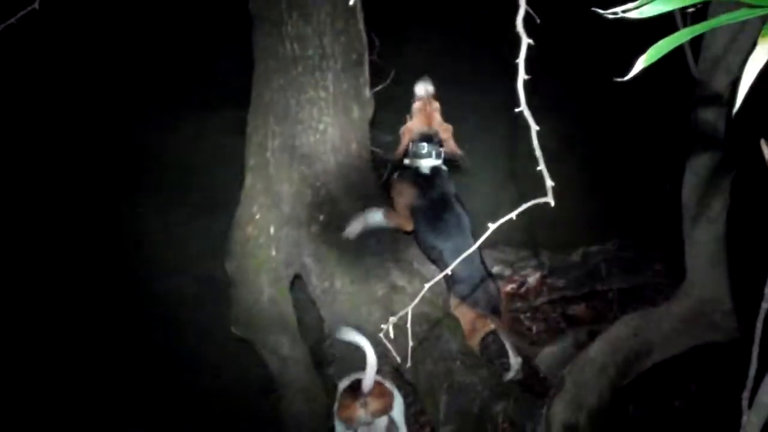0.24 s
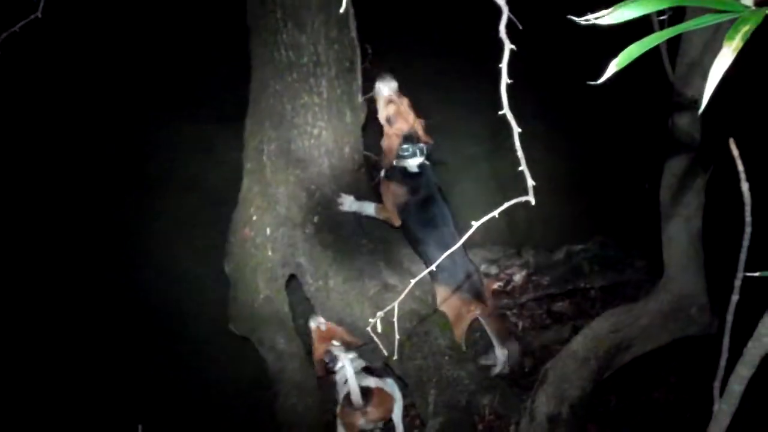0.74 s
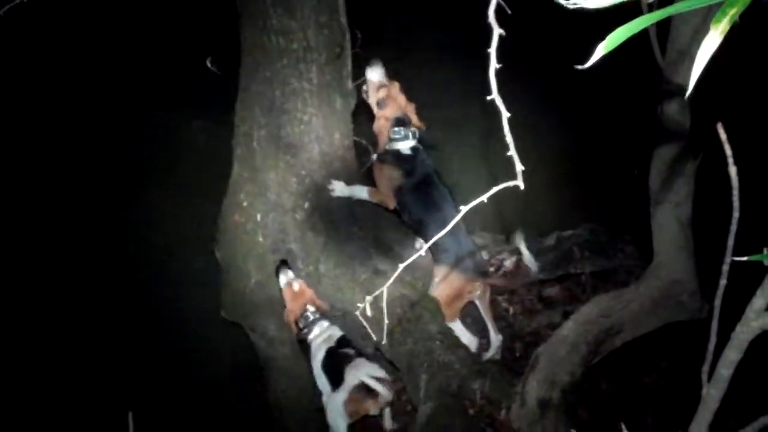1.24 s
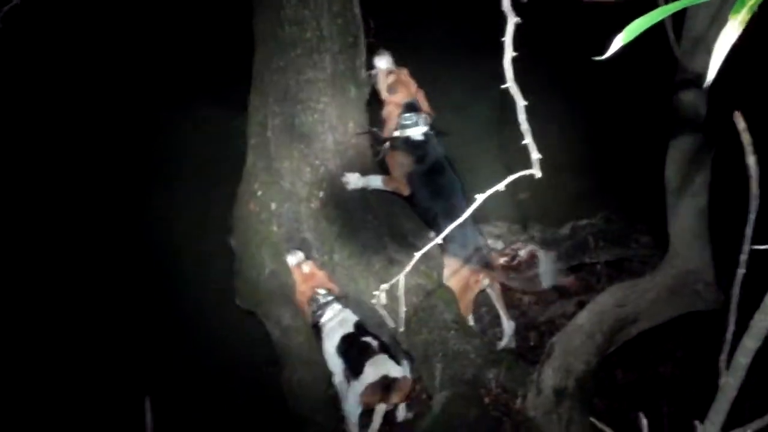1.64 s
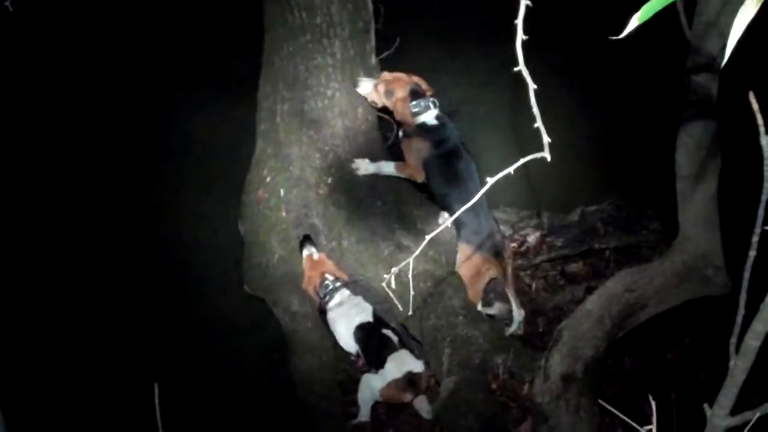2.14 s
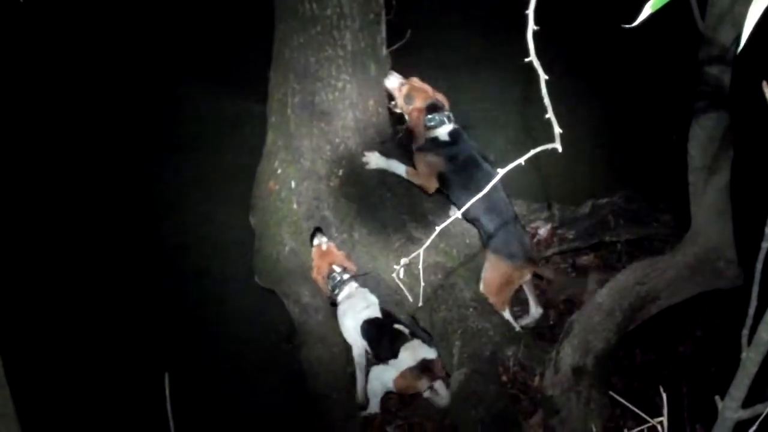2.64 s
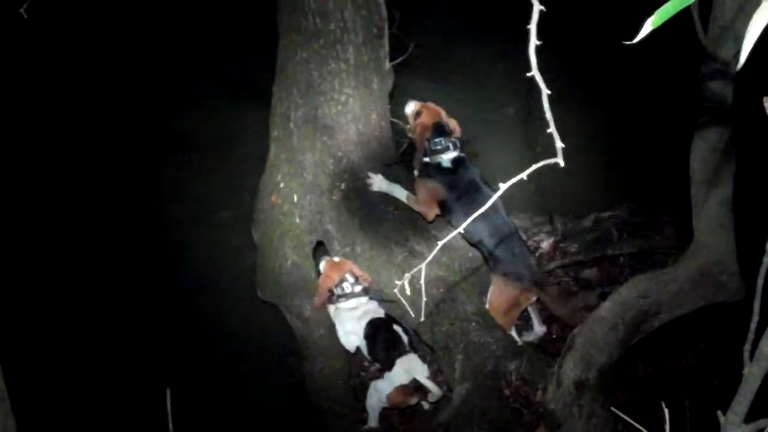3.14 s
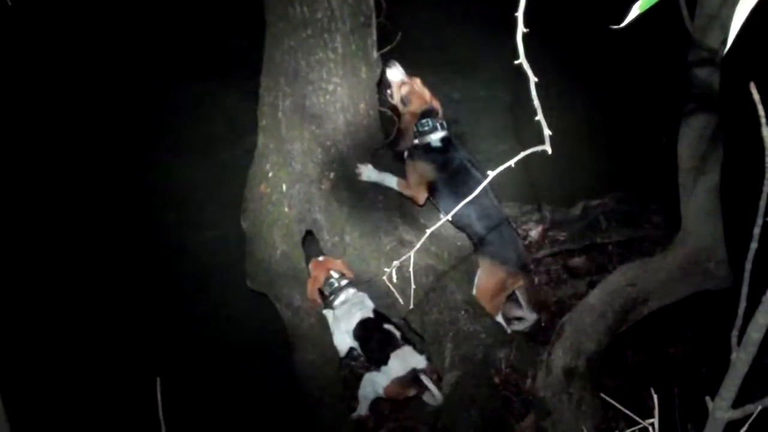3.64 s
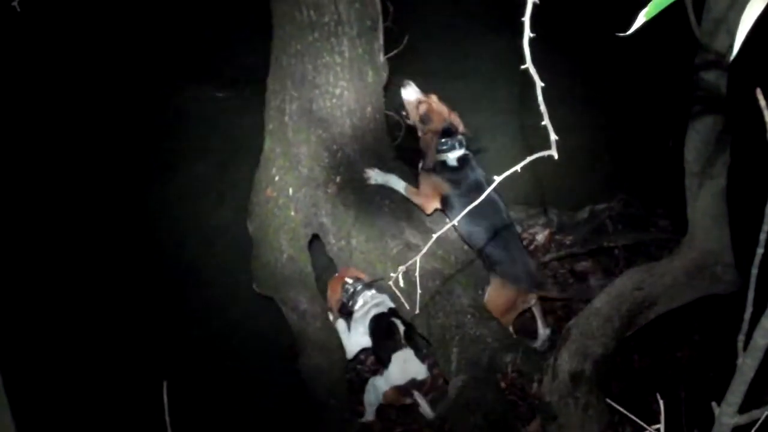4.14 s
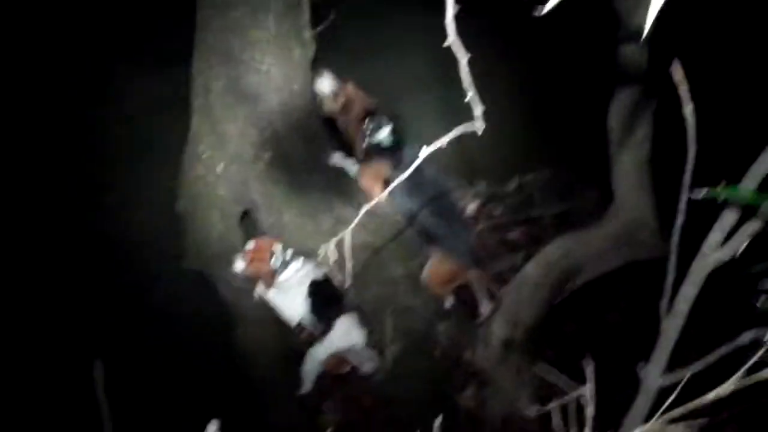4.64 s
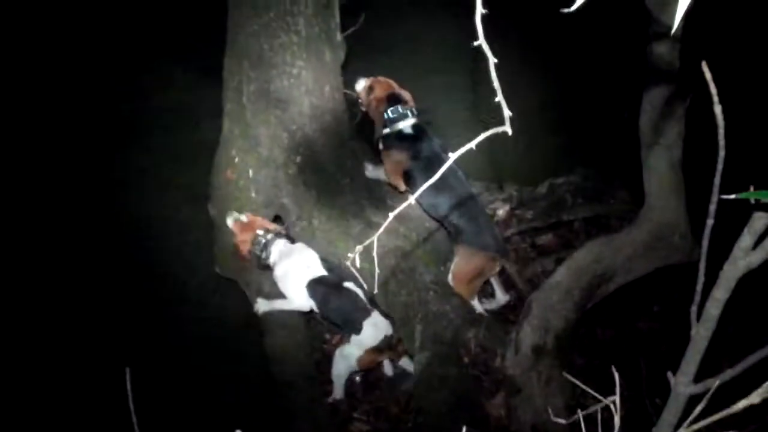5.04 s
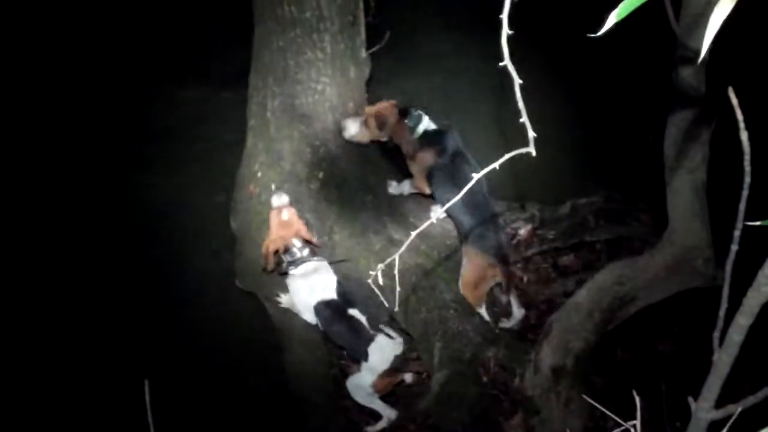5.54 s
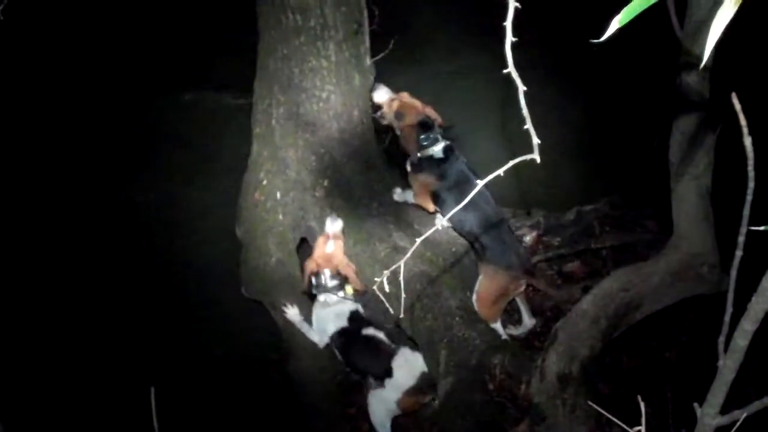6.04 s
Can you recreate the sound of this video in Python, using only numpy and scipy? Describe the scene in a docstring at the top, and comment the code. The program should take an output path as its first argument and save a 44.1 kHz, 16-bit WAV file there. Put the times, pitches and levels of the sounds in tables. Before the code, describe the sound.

Two hounds bark up a tree at night, one in steady hoarse chops about twice a second, the other briefly joining higher, over rustling leaves.

```python
"""Two hounds bark up a tree at night in a wood, close to a small stereo microphone and a little to the left.
Each bark is a stack of voiced partials, with throat resonances rasping most at its start and end.
Breath hiss follows the voice, pitches drop after barks, and thin nose whistles and high squeaks come between.
Claws tick on bark and twigs; paws crackle in the leaves over a low rumble of air on the microphone.
One near trunk throws back treble, the wood sends a diffuse echo, and the loudest barks overload the input."""
import sys
import numpy as np
from scipy import signal
from scipy.io import wavfile

SR = 44100
rng = np.random.default_rng(int(sys.argv[2]) if len(sys.argv) > 2 else 0)


def persist_wave(psi):
    """Save psi, clipped to +-1, as 16-bit WAV."""
    counts = np.round(np.clip(psi, -1, 1) * 32767).astype(np.int16)
    wavfile.write(sys.argv[1], SR, np.atleast_2d(counts).T)


N = 276551
TIME = np.arange(N) / SR

# All source levels are relative: the echoes, the left-right balance and the input stage follow.
# Barks, one curve each: t/s, pitch f/Hz, fundamental level/dB,
# mouth opening as lift of partial 2/dB, strain as lift of partial 3/dB
LOW_HOUND_BARKS = [
    [(.335, 540.5, -29.5, 20, 7), (.362, 555.4, -3.5, 4.5, -10.5), (.385, 528, -3, 9, 1),
     (.395, 537.4, 0.5, -9.5, -17), (.403, 558.2, 0.5, -25, -33), (.435, 558.6, -3, -16, -34),
     (.451, 609.4, -1.5, -29, -35), (.49, 584, -20, -25, -23)],
    [(.705, 447, -58, 22, 28), (.729, 486, -23, 4.5, -8), (.759, 513.6, -16, -11, -4.5),
     (.79, 521, -27, 4, -6)],
    [(1.325, 567, -32.5, 13, -2), (1.341, 532, -15.5, 7, -2.5), (1.363, 505.2, -19, 11, -3),
     (1.415, 506.6, -21, 7, 4), (1.44, 484, -22, -1, -21)],
    [(1.87, 575.5, -19, -4, -22), (1.894, 501.6, -20.5, 7, 0), (1.944, 491.8, -24, 11.5, 2),
     (1.97, 480, -25.5, -2, -4)],
    [(2.3, 479, -29, 28, -18), (2.318, 498, -25, 7, 7), (2.338, 497, -14.5, 7, 2),
     (2.346, 549, -8, -11.5, -9), (2.358, 528, -3.5, -38, -14), (2.392, 576.5, -7.5, -39, -40),
     (2.405, 594, -43, -22.5, 2)],
    [(2.81, 515.6, -32, 9.5, -3), (2.834, 490.6, -21.5, 11.5, -2.5), (2.872, 475.5, -19, -5, 2.5),
     (2.884, 480, -15.5, 2.5, -20), (2.893, 573.5, -10.5, -24, -15), (2.902, 473.5, -17.5, 7.5, -16),
     (2.915, 473, -26, 7, -14)],
    [(3.285, 486, -38, 18, -1), (3.305, 469.2, -16, 11, -2), (3.317, 506.3, -14, 0, 4.5),
     (3.355, 486, -16, 6, -1), (3.369, 498.5, -6, -6, -16.5), (3.393, 558, -13.5, -9.5, -16),
     (3.41, 468, -21.5, 14.5, -18)],
    [(3.74, 526, -31, 4.5, -2), (3.76, 486.6, -17, 13, 5), (3.8, 472.8, -21, 10, 0),
     (3.834, 453, -29, 17, 3.5), (3.855, 414, -34.5, -11, -7)],
    [(4.21, 452, -53, 19.5, 8), (4.226, 498, -25.5, 11, 1.5), (4.254, 470, -30, 21.5, 8.5),
     (4.288, 480.3, -19.5, 3.5, -2), (4.3, 533, -15.5, -17, -21), (4.32, 526, -21, -18, -18)],
    [(4.66, 535.4, -31, 7, -5), (4.676, 502.5, -20.5, 16, 3.5), (4.72, 498.5, -20, 12.5, -1),
     (4.733, 522.6, -7, -21, -13), (4.746, 565, -8, -28, -25), (4.762, 588, -7.5, -11, -28),
     (4.785, 544, -19.5, -22, -23)],
    [(5.465, 515, -46, 29, 8), (5.475, 525.7, -29.5, 17, 11), (5.483, 550, -24.5, 7, 10.5),
     (5.5, 563.3, -12.5, 1, 1.5), (5.519, 620.6, 0, -30, -15), (5.535, 590.4, -2, -11, -14),
     (5.569, 598, -12, -31, -29), (5.61, 615, -15.5, -26, -33)],
    [(5.885, 487.4, -35, 11, 6.5), (5.913, 546, -10, -22, -18.5), (5.937, 538.3, -6, -24, -13.5),
     (5.975, 540, -14.5, -13.5, -20)],
    [(6.05, 553.6, -15, -14, 5), (6.068, 562, -18.5, -13, -10), (6.112, 563.2, -6.5, -14, -10.5),
     (6.135, 550, -37, -28, -20)],
]
HIGH_HOUND_BARKS = [
    [(.33, 648, -33, -5, -16), (.342, 672, -1.5, -37, -35), (.352, 664, -1, -32, -30),
     (.375, 627, -15.5, -24, -19)],
    [(.663, 772, -41, -10, -23), (.669, 823, -25, -7, -18), (.687, 869, -18.5, -1.5, -43),
     (.692, 786, -15.5, -17, -34), (.7, 709.3, -17.5, -2, -12), (.748, 631.4, -9.5, -11, -33),
     (.794, 598, -15, -3.5, -8.5), (.805, 600, -31, -25, -27)],
    [(5.84, 718, -33.5, -25, -20), (5.864, 661.5, -19.5, -16, -12), (5.874, 657, -30.5, 4.5, 3),
     (5.9, 607, -15, -26, -18)],
]
# Falling yelps of the higher hound, rich in upper partials, same columns
HIGH_HOUND_YELPS = [
    [(5.4, 815, -54.5, 29.5, 19.5), (5.432, 705, -42, 17.5, -5.5), (5.454, 666, -11, -3, -9),
     (5.478, 623, -44, 24, 1)],
    [(5.99, 769, -15, -5, -43), (6.006, 675, -41, 0, -11), (6.024, 609.7, -30, 4, -11),
     (6.065, 564, -13, -14, -24)],
]
# Partial 4 against partial 3 with no lift, one value a call [level/dB];
# then the share of the mouth's lift that partial 4 follows [ratio]
LOW_BARK_FOURTH = ([-16, -23, -16.5, -15, -6.5, -3.5, -2.5, -14, -14.5, -13.5, -13.5, -16, -5], 0.65)
HIGH_BARK_FOURTH = ([10, -28, -34], 0.43)
HIGH_YELP_FOURTH = ([-6.5, 8], .1)
# Partials 5 to 12 against partial 4: f/Hz, level/dB
BARK_UPPER_PARTIALS = [(2000, -17), (2500, -22), (3100, -25.5), (4000, -39), (4700, -43.5), (5500, -26)]
YELP_UPPER_PARTIALS = [(2600, 0), (3200, -17), (4200, -16), (4900, -8), (5600, -24), (6400, -20),
                       (7000, -40)]

# Rasp of each call: start t/s, end t/s, level/dB at the opening, in the middle and at the close,
# weight of the lowest throat resonance level/dB
CALL_RASPS = [(0.324, 0.479, -8.5, -10, -11, -10.5), (0.671, 0.833, -42.5, -17.5, -29, 0),
              (1.306, 1.481, -26.5, -34.5, -30, -4.5), (1.856, 2.008, -24.5, -35, -29, -2),
              (2.28, 2.427, -16.5, -24, -23, -6), (2.793, 2.946, -22, -34.5, -21.5, -3),
              (3.278, 3.436, -25, -23.5, -18.5, -1.5), (3.723, 3.88, -24.5, -35, -33.5, 0),
              (4.196, 4.357, -34, -45, -29.5, -4), (4.648, 4.796, -16, -27, -19.5, -4.5),
              (5.02, 5.149, -33.5, -39, -35, -43), (5.413, 5.6, -39, -7, -24, -4),
              (5.853, 6.022, -34.5, -29.5, -26, -0.5), (6.028, 6.158, -23, -11.5, -21.5, -11),
              (6.258, 6.386, -24.5, -20, -20, -27)]
# Level steps/dB: start against the opening, end against the close
RASP_EDGE_STEPS = (-2, -12.5)
# Added weight of the lowest resonance/dB: start, opening, middle, close, end
RASP_LOW_WEIGHTS = (4, 15, 1.5, 0, 26)
# Throat resonances, lowest first: f/Hz, width f/Hz, level/dB
THROAT_RESONANCES = [(663.2, 98, -2.5), (1039.5, 267, -2.5), (1390, 87, -12.5), (1594, 390, -4.5),
                     (1900, 790, -10), (2920, 640, -25.5)]
# Opening after the start [s], middle as share of the length, close before the end [s]
RASP_OPENS_S, RASP_MIDDLE, RASP_CLOSES_S = 0.019, 0.29, 0.043

# Brief tones that lead into a bark before the voice settles: t/s, f/Hz, level/dB
BARK_LEAD_INS = [(0.326, 1031, -9), (1.306, 1143, -16.5), (1.85, 1200, -23), (2.283, 1088, -14),
                 (2.795, 1086, -28), (3.281, 1007, -18), (3.722, 1095, -23.5), (4.644, 1060, -16)]
LEAD_IN_S = 0.026

# Air hissing past tongue and teeth while the voice sounds: f/Hz, width f/Hz, level/dB
BREATH_BANDS = [(4000, 2500, -70.5), (5200, 1500, -40), (6530, 2100, -50), (9270, 1200, -69),
                (11200, 1500, -72)]
BREATH_LAG_S = 0.0022

# Pitch drops as the folds slacken at the end of a bark: start t/s, level/dB
PITCH_DROPS = [(.79, -37), (1.435, -43), (1.965, -41), (2.4, -32.5), (2.91, -35.5), (3.405, -34),
               (3.85, -37), (4.314, -35), (4.775, -32), (5.975, -34), (6.13, -47)]
# Course of each drop: t/s after its start, pitch f/Hz, level/dB
DROP_COURSE = [(0, 440, -3), (.02, 340, 0), (.042, 185, -7), (.075, 115, -14)]
DROP_BARE_DB = -11   # fundamental, heard below the throat resonance

# Nose whistles and whines: t/s, length t/s, start f/Hz, loudest f/Hz, end f/Hz,
# peak level/dB, overtone against it level/dB
NOSE_WHISTLES = [(.51, .11, 3841, 3750, 3830, -50, -8), (0.625, .06, 3728, 4185, 4522, -35.5, -14.5),
                 (1.06, 0.053, 3860, 3815, 3810, -35.5, -42), (2.265, 0.02, 3720, 3880, 4050, -25.5, -17),
                 (2.774, 0.021, 4120, 3960, 3930, -44, -8), (3.206, 0.011, 3780, 3470, 3720, -31.5, -33),
                 (3.264, 0.012, 3930, 4020, 4160, -20, -25), (4.991, 0.025, 3600, 4120, 4510, -42.5, -46),
                 (5.05, 0.088, 1278, 1146, 1050, -39, 7), (5.081, 0.07, 1910, 2076, 2246, -22.5, -16),
                 (5.097, 0.052, 4020, 3800, 3230, -36, -11), (5.198, 0.047, 2370, 2750, 3190, -30, -16),
                 (5.214, 0.086, 3130, 3050, 2900, -31.5, -30), (5.336, .025, 2720, 3280, 3460, -31, -8),
                 (5.36, .04, 3670, 4300, 4700, -45.5, -20), (5.411, 0.026, 3730, 4000, 4030, -29, -1.5),
                 (5.445, 0.024, 4370, 4240, 4050, -30, -11), (5.83, 0.022, 3970, 4080, 4100, -39, -12),
                 (5.932, 0.027, 3210, 3330, 4000, -42.5, -13), (6.155, 0.03, 2310, 2670, 2950, -37, -26)]
WHISTLE_PEAK, WHISTLE_EDGE_DB = 0.46, -15   # loudest point as share of the length; ends against the peak

# High squeaks as the mouth opens: t/s, peak level/dB, f/Hz
MOUTH_SQUEAKS = [(0.332, -24, 9120), (0.6734, -40, 8970), (1.3104, -43, 8860), (1.85, -45, 8840),
                 (2.2872, -28, 8900), (2.7945, -36, 8900), (3.2823, -30, 9050), (3.7336, -34, 8880),
                 (4.2024, -49.5, 9100), (4.649, -35.5, 8970), (5.434, -24.5, 8950), (5.851, -41, 8960),
                 (6.25, -43.5, 8920)]
# Weaker side tones of a squeak: offset f/Hz, level/dB
SQUEAK_SIDE_TONES = [(-1250, -8), (1195.5, -12.5)]
SQUEAK_RISE_S, SQUEAK_EARLY_S = 0.0079, 0.0045   # rise time; start ahead of the listed time

# Claws and twigs: t/s, level/dB
CLAW_TICKS = [(0.164, -29.5), (0.2032, -32), (1.322, -30), (3.049, -72), (3.1908, -54), (3.2104, -47),
              (4.5244, -39.5), (5.032, -45), (5.051, -39.5), (5.1674, -41), (5.474, -27), (5.52, -27),
              (5.742, -45), (6.0582, -33.5)]
# Damped modes of bark and twigs: f/Hz, level/dB, decay by 60 dB t/s
BARK_AND_TWIG_MODES = [(1700, 1.5, .012), (2820, 3, .01), (3830, 0, 0.036), (5120, 4.5, 0.01),
                       (6620, -1, 0.0048), (9300, -5, 0.012)]

NEAR_TRUNK_S, NEAR_TRUNK_DB, NEAR_TRUNK_HZ = 0.0015, -6, 2760   # delay, level, lower edge of the treble
WOOD_DB, WOOD_DULL_HZ, WOOD_ALIKE = -18.5, 3000, 0.92   # echo level, treble loss, left-right likeness
WOOD_T60_S = 0.38
FAR_T60_S, FAR_DB = 0.84, -18.5   # distant trunks answer weaker and longer

# Paws in the leaves and air on the microphone: t/s, rustle level/dB, rumble level/dB
GROUND_LEVELS = [(0.0, -32, -39.5), (0.42, -31, -66), (0.56, -47, -83), (1.1, -45.5, -66.5),
                 (1.94, -50, -83), (2.3, -36.5, -55), (2.6, -46, -68.5), (3.04, -42, -63),
                 (3.28, -36.5, -55), (3.44, -43, -61), (4.36, -52, -74), (4.7, -34, -60), (4.89, -46, -75),
                 (5.19, -36, -85), (5.32, -40, -52), (5.45, -27.5, -55), (5.66, -47.5, -66),
                 (6.05, -38, -56), (6.27, -49.5, -60)]
# Colour of the leaves: f/Hz, level/dB per Hz
LEAF_SPECTRUM = [(150, -18), (300, -5.5), (600, 1.5), (1500, 2.5), (3000, -3), (4500, -2), (6300, -17.5),
                 (9000, -13.5), (11000, -27), (14000, -29.5)]
# Leaves at left and right: f/Hz, likeness [ratio]
LEAF_LIKENESS = [(60, 0.45), (150, 0.2), (390, 1), (1010, 0.95), (2600, 0.25)]

LEFT_LOUDER_DB = 2
MICROPHONE_TOP_HZ, CUTOFF_HZ = 11600, 14500
LOPSIDED, OVERLOAD = 0.015, 1.3   # share of the squared signal; clipping ceiling


def amp(db):
    """Decibels to gain."""
    return 10 ** (np.asarray(db) / 20)


def rms_one(x):
    """Scale to unit rms."""
    return x / np.sqrt(np.mean(x ** 2) + 1e-20)


def at_hz(points, hz):
    """Read a spectrum on a log-frequency axis."""
    points = np.array(points)
    return np.interp(np.log(hz), np.log(points[:, 0]), points[:, 1])


def drift(rate_hz):
    """Low-passed noise of unit rms: a random wander, faster at a higher rate."""
    r = np.exp(-2 * np.pi * rate_hz / SR)
    noise = rng.standard_normal(N + SR)
    settled = signal.lfilter([1], [1, -2 * r, r * r], noise)[SR:]
    return rms_one(settled)


def resonance(x, hz, width_hz):
    """Two-pole resonance with a gain of about 1 at its top."""
    r = np.exp(-np.pi * width_hz / SR)
    feedback = [1, -2 * r * np.cos(2 * np.pi * hz / SR), r * r]
    return signal.lfilter([(1 - r * r) / 2, 0, (r * r - 1) / 2], feedback, x)


def call(rows, fade_s):
    """Sample range, faded window and interpolated columns of one call."""
    s, *columns = np.transpose(rows)
    span = slice(int(s[0] * SR), min(int(s[-1] * SR) + 1, N))
    t = TIME[span]
    edge_distance = np.minimum(t - s[0], s[-1] - t)
    window = np.sin(np.pi / 2 * np.clip(edge_distance / fade_s, 0, 1))
    return span, window, [np.interp(t, s, c) for c in columns]


def voice(calls, fourth, upper, jitter, shimmer_db):
    """Vocal folds give a stack of wavering partials; an open mouth and strain lift the upper ones."""
    out, wobble, flutter = np.zeros(N), drift(86), drift(45)
    shut_levels, lift_share = fourth
    for rows, shut_db in zip(calls, shut_levels):
        span, window, (pitch, level_db, lift_db, strain_db) = call(rows, fade_s=0.0048)
        phase = 2 * np.pi * np.cumsum(pitch * (1 + jitter * wobble[span])) / SR
        fourth_db = strain_db + shut_db + lift_share * lift_db
        partials_db = [0, lift_db, strain_db, fourth_db]   # against the fundamental
        partials_db += [fourth_db + at_hz(upper, k * pitch) for k in range(5, 13)]
        for k, db in enumerate(partials_db, start=1):
            gain = amp(level_db + db + shimmer_db * flutter[span])
            out[span] += np.sqrt(2) * window * gain * np.sin(k * phase)
    return out


def rasp():
    """Uneven fold pulses and breath noise ring the throat resonances, shaped from opening to close."""
    pulses = (rng.random(N) < 700 / SR) * rng.standard_normal(N) * 4.75   # about 700 a second
    source = pulses + rng.standard_normal(N)
    bands = []
    for k, (hz, width, db) in enumerate(THROAT_RESONANCES):
        ringing = resonance(resonance(source, hz, width), hz, 1.3 * width)
        bands.append(amp(db) * rms_one(ringing) * (-1) ** k)   # neighbours in opposite polarity
    out, lowest, upper = np.zeros(N), bands[0], sum(bands[1:])
    for s, end, open_db, middle_db, close_db, low_db in CALL_RASPS:
        times = [s, s + RASP_OPENS_S, s + RASP_MIDDLE * (end - s), end - RASP_CLOSES_S, end]
        start_db, end_db = open_db + RASP_EDGE_STEPS[0], close_db + RASP_EDGE_STEPS[1]
        levels = [start_db, open_db, middle_db, close_db, end_db]
        rows = np.transpose([times, levels, np.add(RASP_LOW_WEIGHTS, low_db)])
        span, window, (level_db, weight_db) = call(rows, fade_s=0.018)
        out[span] += window * amp(level_db) * (upper[span] + amp(weight_db) * lowest[span])
    return out


def lead_ins():
    """A single tone near the second throat resonance swells and fades."""
    out = np.zeros(N)
    for s, hz, db in BARK_LEAD_INS:
        swell = np.sin(np.pi * np.clip((TIME - s) / LEAD_IN_S, 0, 1))
        out += np.sqrt(2) * amp(db) * swell * np.sin(2 * np.pi * hz * TIME)
    return out


def breath(voices):
    """Turbulent hiss that grows more slowly than the voice and trails it a little."""
    r = np.exp(-1 / (BREATH_LAG_S * SR))
    effort = signal.lfilter([1 - r], [1, -r], voices ** 2) ** 0.41
    air = rng.standard_normal(N) * amp(4.7 * drift(52))
    hiss = sum(amp(db) * rms_one(resonance(air, hz, width)) for hz, width, db in BREATH_BANDS)
    return effort * hiss


def drops():
    """Slowing fold pulses sweep their partials through the lowest throat resonance."""
    pulses, bare = np.zeros((2, N))
    for s, db in PITCH_DROPS:
        span, window, (pitch, level_db) = call(np.add(DROP_COURSE, [s, 0, db]), fade_s=0.006)
        phase = 2 * np.pi * np.cumsum(pitch) / SR
        partials = sum(np.cos(k * phase) for k in range(2, 7))
        pulses[span] += window * amp(level_db) * partials
        bare[span] += window * amp(level_db + DROP_BARE_DB) * np.sin(phase)
    lowest_hz, lowest_width_hz = THROAT_RESONANCES[0][:2]
    return 2.0 * resonance(pulses + 1e-18, lowest_hz, lowest_width_hz) + bare


def whistles():
    """Air in the nose gives near-sines with one overtone, slightly breathy, that swell and fade."""
    out, wobble = np.zeros(N), drift(200)
    for s, length, start_hz, loud_hz, end_hz, db, overtone_db in NOSE_WHISTLES:
        edge_db = db + WHISTLE_EDGE_DB
        rows = [(s, start_hz, edge_db), (s + WHISTLE_PEAK * length, loud_hz, db),
                (s + length, end_hz, edge_db)]
        span, window, (pitch, level_db) = call(rows, fade_s=0.0022)
        phase = 2 * np.pi * np.cumsum(pitch * (1 + 0.0071 * wobble[span])) / SR
        tone = np.sin(phase) + amp(overtone_db) * np.sin(2 * phase)
        out[span] += np.sqrt(2) * window * amp(level_db) * tone
    return out


def squeaks():
    """A short high tone with a weaker tone on either side swells fast and dies more slowly."""
    out = np.zeros(N)
    for s, peak_db, hz in MOUTH_SQUEAKS:
        age = np.maximum(TIME - s + SQUEAK_EARLY_S, 0) / SQUEAK_RISE_S
        swell = (age * np.exp(1 - age)) ** 2
        for offset, side_db in [(0, 0.013)] + list(SQUEAK_SIDE_TONES):
            out += amp(peak_db + side_db) * swell * np.sin(2 * np.pi * (hz + offset) * TIME)
    return out


def ticks():
    """Each tick strikes the damped modes of bark and twigs with random strengths of its own."""
    strengths_db = rng.normal(0, 3, (len(CLAW_TICKS), len(BARK_AND_TWIG_MODES)))
    times, levels_db = np.transpose(CLAW_TICKS)
    strikes = np.round(times * SR).astype(int)
    out = np.zeros(N)
    for k, (hz, mode_db, t60) in enumerate(BARK_AND_TWIG_MODES):
        clicks = np.full(N, 1e-18)
        clicks[strikes] = amp(levels_db + mode_db + strengths_db[:, k])
        r, w = amp(-60 / (t60 * SR)), 2 * np.pi * hz / SR
        out += signal.lfilter([0, np.sin(w)], [1, -2 * r * np.cos(w), r * r], clicks)
    return out


def near_trunk(near):
    """A trunk to one side returns delayed treble, in opposite polarity at left and right."""
    high_pass = signal.butter(2, NEAR_TRUNK_HZ, "high", fs=SR, output="sos")
    treble = signal.sosfilt(high_pass, near)
    delayed = np.interp(TIME - NEAR_TRUNK_S, TIME, treble)
    return amp(NEAR_TRUNK_DB) * delayed * [[1], [-1]]


def wood(x):
    """Many trunks scatter the sound: a dying cloud of echoes, partly shared by both sides."""
    t = np.arange(SR) / SR
    decay = np.hypot(amp(-60 * t / WOOD_T60_S), amp(FAR_DB - 60 * t / FAR_T60_S))
    onset = np.clip(t / 0.011, 0, 1)
    shared, own = rng.standard_normal((2, SR)) * decay * onset
    echoes = np.sqrt(1 + WOOD_ALIKE) * shared + np.sqrt(1 - WOOD_ALIKE) * own * [[1], [-1]]
    echoes = signal.sosfilt(signal.butter(1, WOOD_DULL_HZ, fs=SR, output="sos"), echoes)
    echoes = echoes / np.sqrt(np.sum(echoes ** 2) / 2)
    return amp(WOOD_DB) * signal.fftconvolve(echoes, x[None], axes=1)[:, :N]


def leaf_rustle():
    """Dense leaf crackle in half-octave bands that flicker apart, of unit rms."""
    snaps = rng.random((2, 1, N)) < 900 / SR   # about 900 a second in each of two noises
    crackle = snaps * amp(2.28 * rng.exponential(1, (2, 1, N))) * 1.57
    noises = rng.standard_normal((2, 2, N)) * (1 + crackle)
    leaves, together, edges = 0, drift(15), 140 * 2 ** np.arange(0, 7.1, 0.5)
    for k, (low, high) in enumerate(zip(edges, edges[1:])):
        band = signal.butter(2, [low, high], "band", fs=SR, output="sos")
        mid, side = signal.sosfilt(band, noises[k % 2])   # neighbouring bands use different noises
        hz = np.sqrt(low * high)
        alike = np.clip(at_hz(LEAF_LIKENESS, hz), -1, 1)
        gain = amp(at_hz(LEAF_SPECTRUM, hz) + 1.2 * together + 1.3 * drift(14))
        leaves = leaves + gain * (np.sqrt(1 + alike) * mid + np.sqrt(1 - alike) * side * [[1], [-1]])
    return rms_one(leaves)


def air_rumble():
    """Air on the microphone: low noise, wide between the channels, in random lumps."""
    band = signal.butter(2, [18, 130], "band", fs=SR, output="sos")
    mid, side = signal.sosfilt(band, rng.standard_normal((2, N)))
    return rms_one(mid + 0.86 * side * [[1], [-1]]) * amp(2.0 * drift(5))


def ground():
    """Paws raise and lower the leaf rustle, over the changing rumble."""
    s, rustle_db, rumble_db = np.transpose(GROUND_LEVELS)
    rustle = amp(np.interp(TIME, s, rustle_db)) * leaf_rustle()
    return rustle + amp(np.interp(TIME, s, rumble_db)) * air_rumble()


def scene():
    """Hounds, near trunk, the wood's echo and the ground, all a little louder at left."""
    barks = voice(LOW_HOUND_BARKS, LOW_BARK_FOURTH, BARK_UPPER_PARTIALS, jitter=0.005, shimmer_db=0.8)
    high = voice(HIGH_HOUND_BARKS, HIGH_BARK_FOURTH, BARK_UPPER_PARTIALS, jitter=0.007, shimmer_db=1.0)
    yelps = voice(HIGH_HOUND_YELPS, HIGH_YELP_FOURTH, YELP_UPPER_PARTIALS, jitter=0.008, shimmer_db=1.5)
    voices = barks + high + yelps + rasp() + lead_ins()
    near = voices + breath(voices) + drops() + whistles() + squeaks() + ticks()
    pan = amp([[LEFT_LOUDER_DB / 2], [-LEFT_LOUDER_DB / 2]])
    return pan * (near + near_trunk(near) + wood(near) + ground())


def record(dry):
    """The microphone loses the top; a lopsided input thumps under loud barks and clips with a short knee."""
    heard = signal.sosfilt(signal.butter(8, MICROPHONE_TOP_HZ, fs=SR, output="sos"), dry)
    bent = heard + LOPSIDED * heard ** 2
    clipped = bent / (1 + np.abs(bent / OVERLOAD) ** 8) ** (1 / 8)
    cut = signal.sosfilt(signal.cheby2(10, 50, CUTOFF_HZ, fs=SR, output="sos"), clipped)
    return np.clip(cut, -1, 1)


dry = scene()
out = record(dry)
persist_wave(out)
```